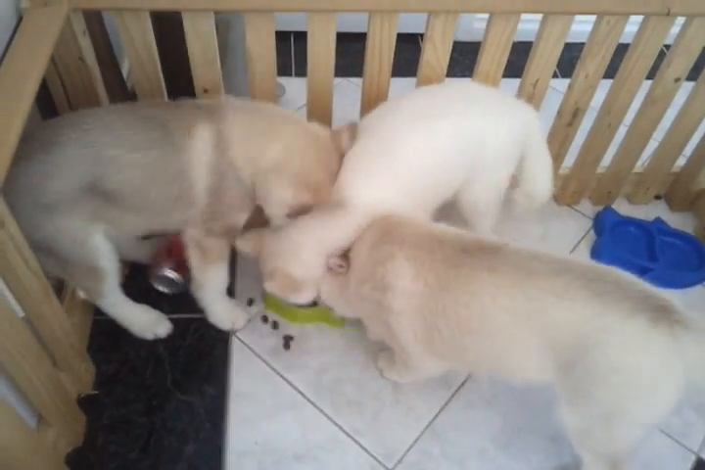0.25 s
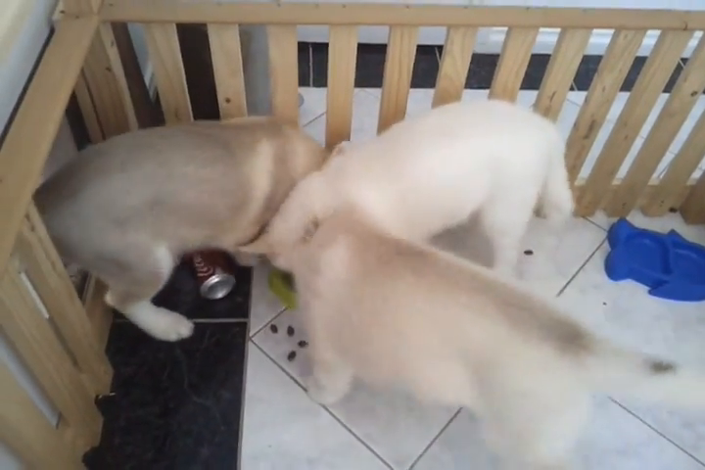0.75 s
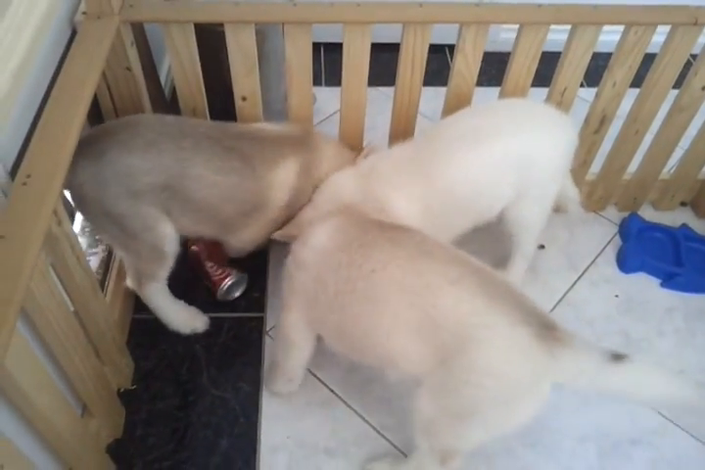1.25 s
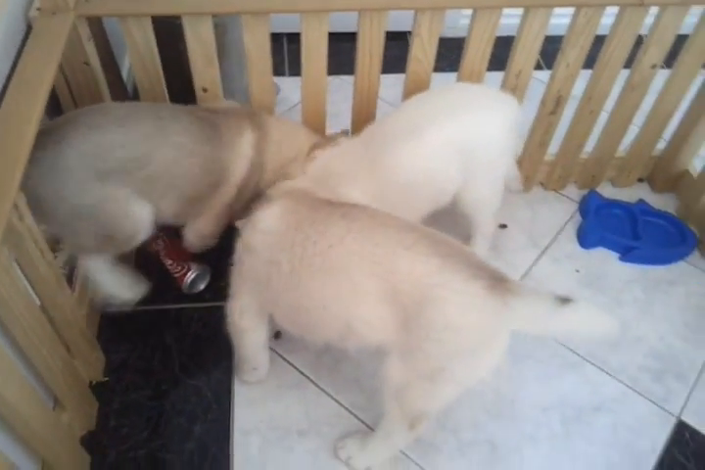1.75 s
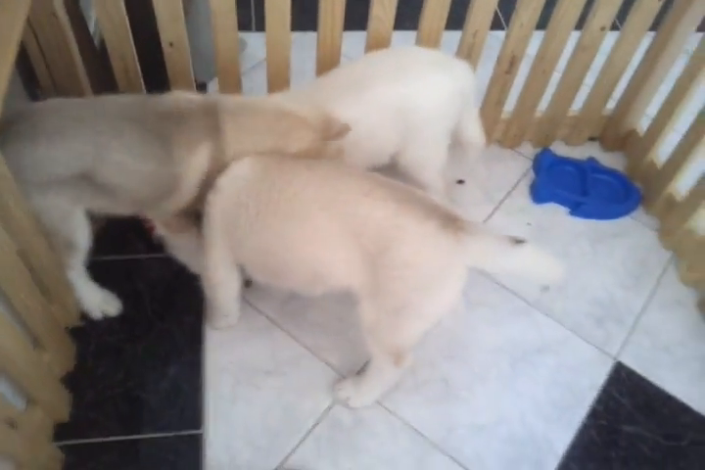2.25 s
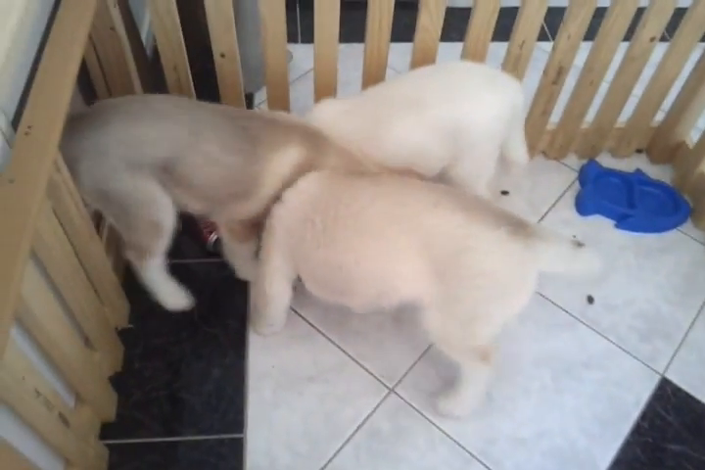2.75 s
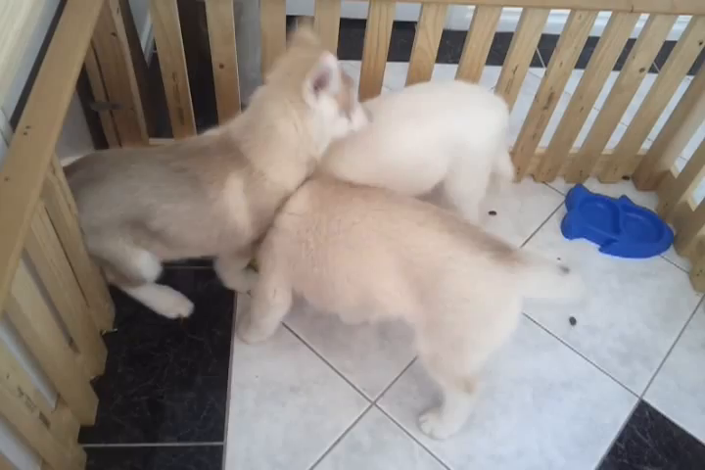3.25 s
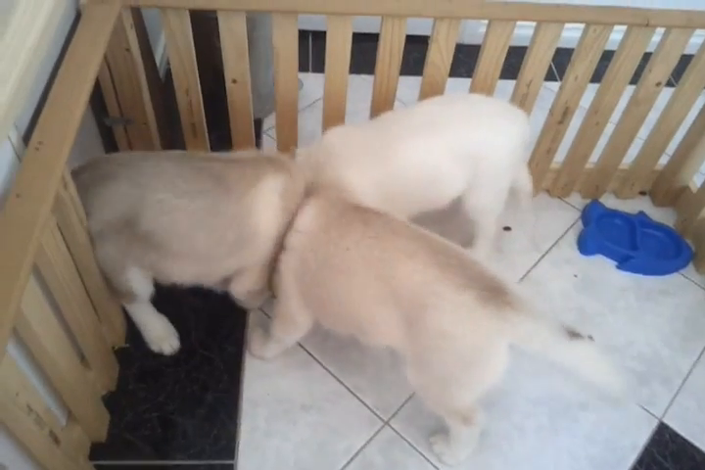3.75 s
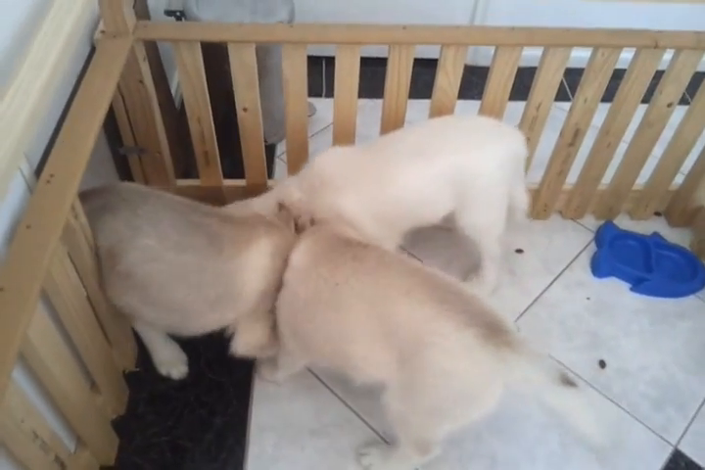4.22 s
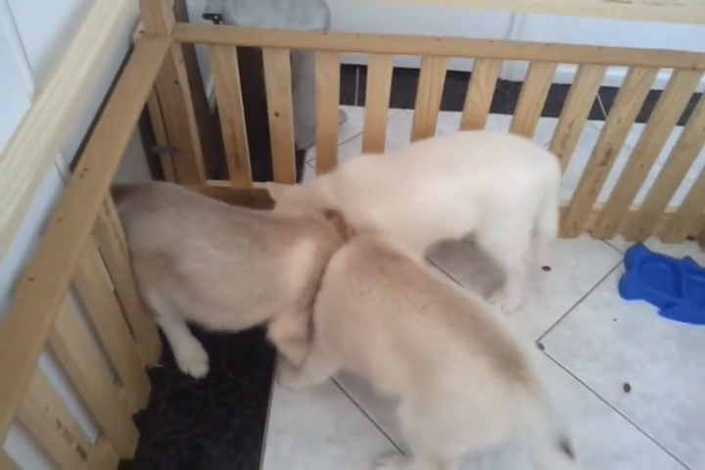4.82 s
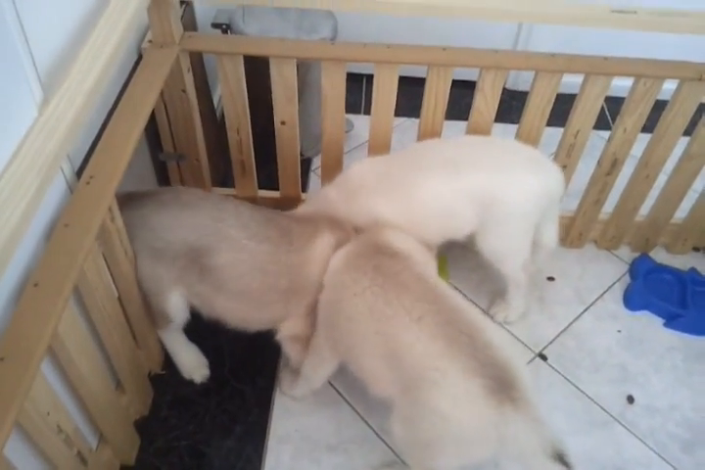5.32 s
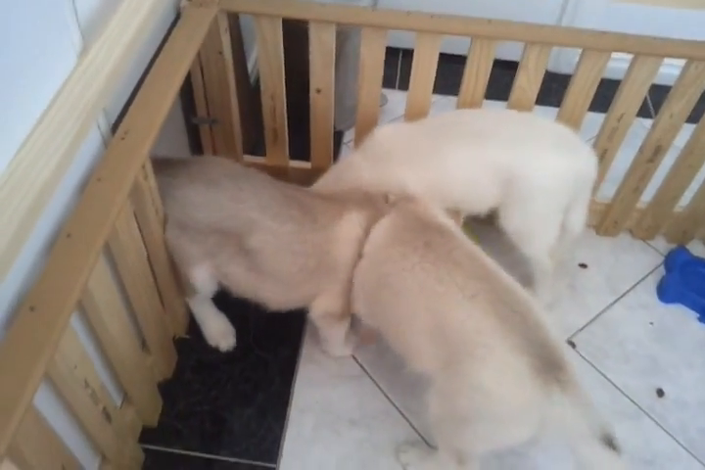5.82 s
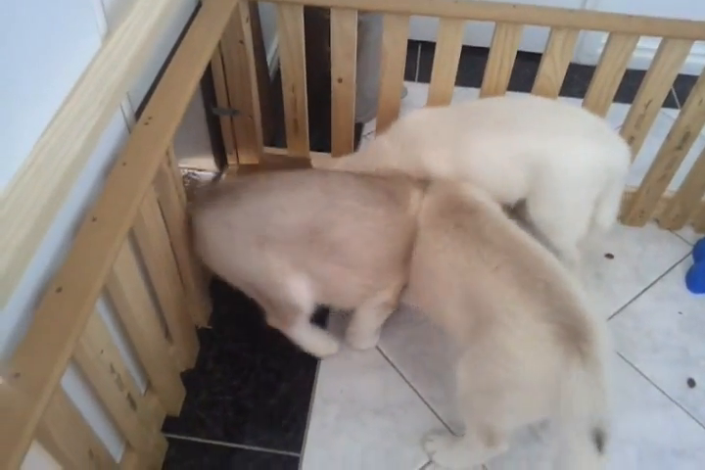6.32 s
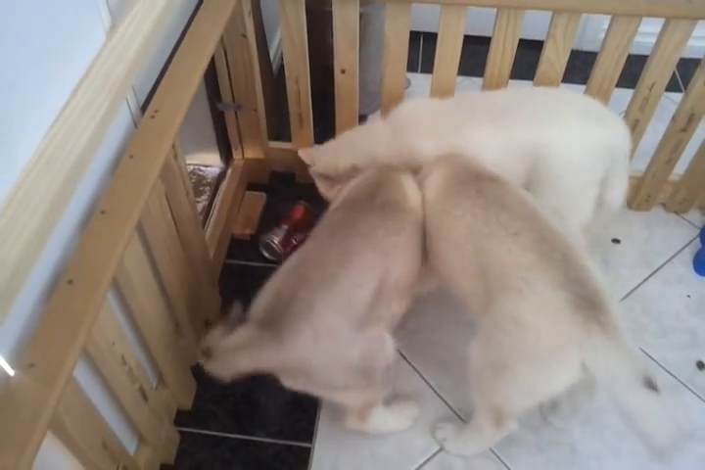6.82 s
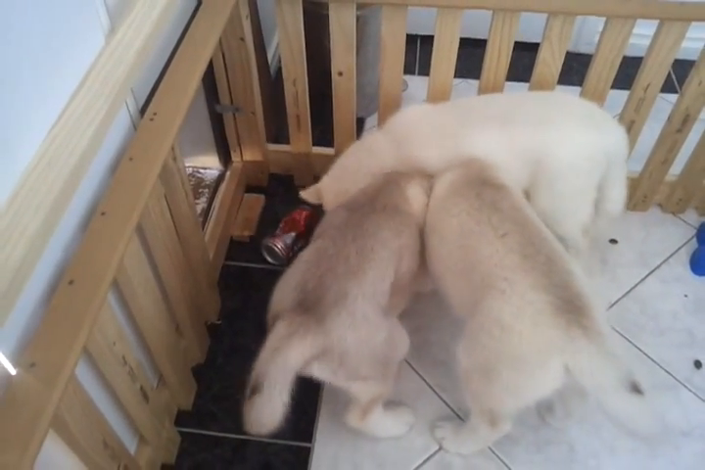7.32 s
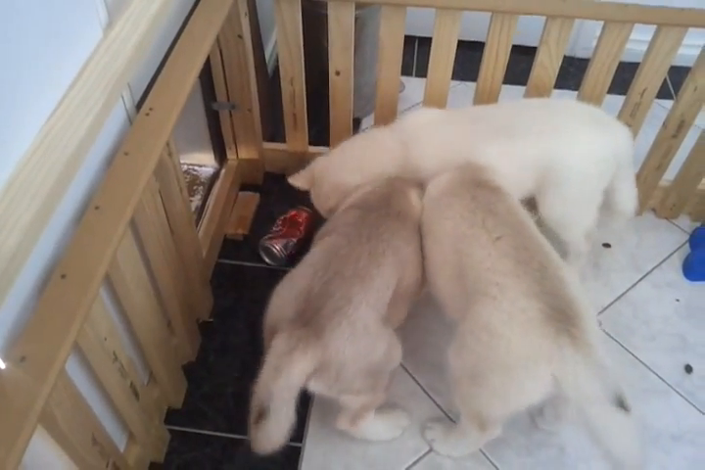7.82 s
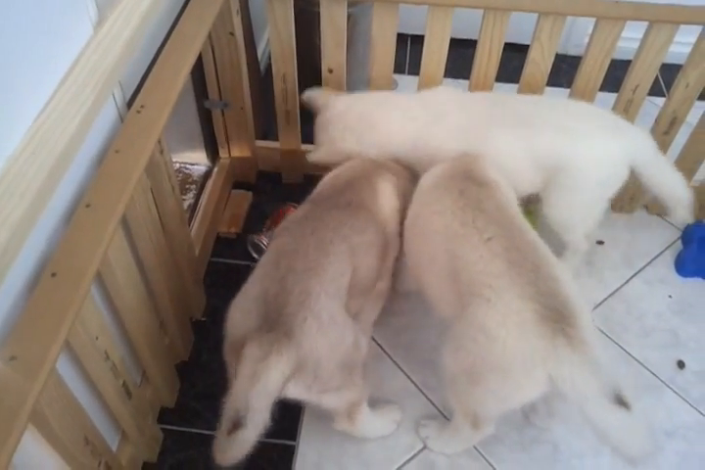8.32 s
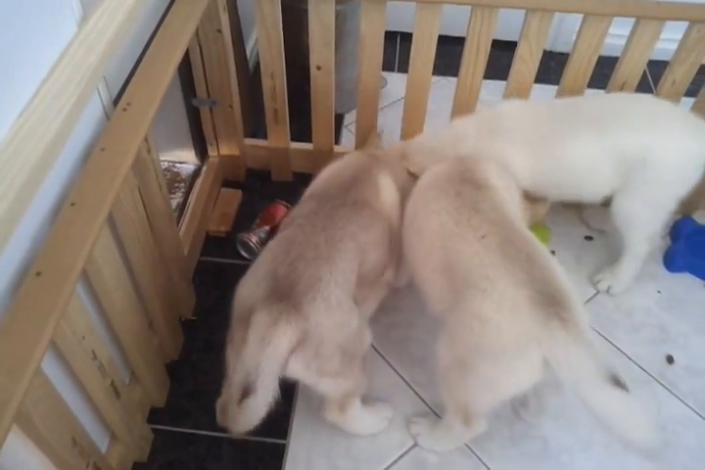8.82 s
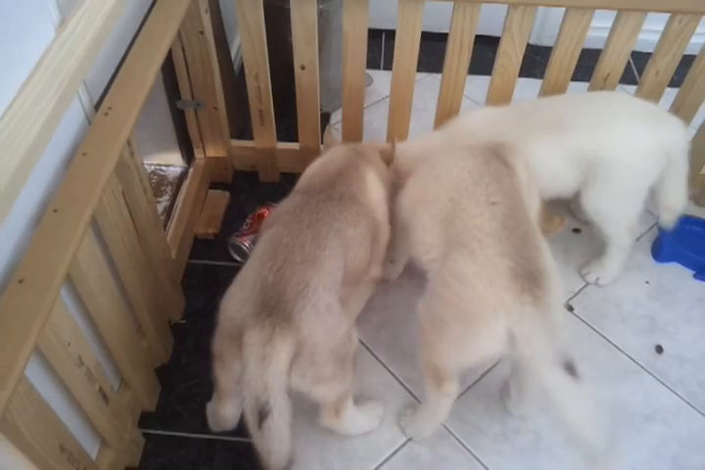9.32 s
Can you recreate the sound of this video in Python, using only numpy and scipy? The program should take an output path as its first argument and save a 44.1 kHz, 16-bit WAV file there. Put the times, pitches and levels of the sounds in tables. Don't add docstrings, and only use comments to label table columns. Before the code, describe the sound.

A plastic food bowl scrapes and bangs on a tile floor in an echoing bare room as puppies jostle, kibble ticks and a metal can clanks.

```python
import sys
import numpy as np
from scipy import signal
from scipy.fft import rfft, irfft, next_fast_len
from scipy.io import wavfile
from scipy.ndimage import uniform_filter1d, minimum_filter1d

SR = 44100
rng = np.random.default_rng(int(sys.argv[2]) if len(sys.argv) > 2 else 0)


def boost_factor(decibels):
    exponent = np.asarray(decibels, float) / 20
    return 10 ** exponent


def unload_wav(signal):
    wavfile.write(
        sys.argv[1],
        SR,
        np.round(np.clip(np.atleast_2d(signal).T, -1, 1) * 32767).astype(np.int16),
    )


N = 421596


def unit(x):
    return x / np.sqrt(np.mean(x ** 2) + 1e-20)


def peaked(x):
    return x / np.abs(x).max()


def add(out, x, s):
    part = out[round(s * SR):][:len(x)]
    part += x[:len(part)]


def along(points, hz):
    point_hz, value = np.transpose(points)
    return np.interp(np.log(hz + 1), np.log(point_hz + 1), value)


def filtered(x, response):
    size = next_fast_len(len(x) + 1024)
    return irfft(rfft(x, size) * response(np.fft.rfftfreq(size, 1 / SR)), size)[:len(x)]


def coloured(x, spectrum):
    return filtered(x, lambda hz: boost_factor(along(spectrum, hz)))


def resonant(x, modes):
    def response(hz):
        total = 0
        for k, (centre, width, db) in enumerate(modes):
            rub = 1j * hz * width
            total = total + (-1) ** k * boost_factor(db) * rub / (centre * centre - hz * hz + rub)
        return total
    return filtered(x, response)


def grains(count, rate, spread_db):
    hit, size, sign = rng.random((3, count))
    return (hit < rate / SR) * boost_factor(-spread_db * np.log(size + 0.018)) * np.sign(sign - .5)


def spray(count, rate, life, first):
    x = grains(count, rate, spread_db=3.5) * np.exp(-np.arange(count) / SR / life)
    x[0] = first
    return x


def swells(s, db, fade_s, rest_db, rise_share=0.58):
    t = np.arange(0, N, 256) / SR
    s, db, fade_s, rise_share = [np.reshape(column, (-1, 1)) for column in (s, db, fade_s, rise_share)]
    fall_db = 20 * np.where(t > s, t - s, (s - t) / rise_share) / fade_s
    power = np.sum(boost_factor(db - fall_db) ** 2, axis=0) + boost_factor(rest_db) ** 2
    return np.interp(np.arange(N) / SR, t, np.sqrt(power))


def ring(db, hz, t60, attack_s):
    t = np.arange(SR // 2) / SR
    return boost_factor(db - 60 * t / t60) * (1 - np.exp(-t / attack_s)) * np.sin(2 * np.pi * hz * t)


# frequency in Hz, level in dB.
HUSH_COLOUR = [(12, -31.5), (20, 0.5), (74, -2), (108, -6), (187, -20), (266, -1.5), (334, -22),
               (499, -5.5), (2370, -13.5), (6010, -13.5), (8120, -22), (10600, -72), (17900, -120)]


def hush():
    return boost_factor(-51) * unit(coloured(rng.standard_normal(N), HUSH_COLOUR))


# frequency in Hz, time to fall 60 dB in seconds.
ROOM_DECAY = [(100, 0.17), (500, 0.8), (1500, 0.59), (4000, 0.6), (8000, 0.23)]


def room(x):
    hz, t, z = signal.stft(rng.standard_normal(3 * SR // 4), SR, nperseg=256)
    fade = boost_factor(-60 * t / along(ROOM_DECAY, hz)[:, None])
    tail = signal.istft(z * fade, SR, nperseg=256)[1]
    age = np.arange(len(tail)) / SR
    lumps = np.repeat(rng.standard_normal(len(tail) // 64 + 1), 64)[:len(tail)]
    tail = tail * boost_factor(3.8 * np.clip(lumps, -2, 2) * np.exp(-age / .08))
    tail = tail * (1 - np.exp(-age / 0.00088))
    return signal.fftconvolve(x, boost_factor(6) * tail / np.linalg.norm(tail))


# frequency in Hz, width in Hz, level in dB.
BOWL_MODES = [(518.5, 33, -3.5), (608, 31, -0.5), (654, 124, -5.5), (746, 66, -3), (941, 185, -8),
              (1284, 256, -7.5), (1478, 142, -4), (1687, 480, -12.5), (2370, 220, -14), (2935, 644, -22.5)]
# frequency in Hz, width in Hz, level in dB.
DEEP_MODES = [(124, 28, -19), (234.6, 27, -1), (365, 53.4, 0.5), (449, 41.6, 0.5)]
# frequency in Hz, level in dB per Hz.
PELLET_COLOUR = [(1180, -43.5), (2000, -9.5), (4930, -2.5), (6540, 1), (8120, -8.5), (10600, -58),
                 (17900, -120)]
# frequency in Hz, level in dB per Hz.
THUD_COLOUR = [(30, -27), (70, 8), (130, 7), (250, 8), (400, -2), (800, -52.5)]
# full push in seconds, push in dB, pellets over push in dB, time to fade 20 dB in seconds.
DRAGS = [(.001, -9.5, -13, 0.0456), (.4, -25.5, -12.5, 0.21), (.52, -23, -12, 0.27),
         (1.171, -33.5, -6, 0.46), (1.817, -29, -5, 0.24), (2.95, -36, -8.5, 0.26), (3.6, -21.5, -10, .15),
         (4.532, -26, -10, 0.32), (5.085, -20.5, -3.5, 0.18), (5.479, -25.5, -11.5, 0.19),
         (6.465, -19.5, -14, 0.11), (6.53, -27.5, -3.5, 0.14), (6.843, -31.5, 2.5, 0.23),
         (7.155, -26.5, -13.5, 0.26)]
# full push in seconds, push in dB, pellets over push in dB, time to fade 20 dB in seconds.
SKIDS = [(.12, -35, 4, 0.7), (.331, -14.5, -12.5, 0.27), (.64, -30, -8, 0.07), (.95, -38, -5.5, .3),
         (1.435, -21, -12.5, 0.24), (1.53, -27, -17.5, 0.14), (2.3, -41.5, -8, 1), (2.573, -32, -3, 0.38),
         (3.05, -35.5, -3, .3), (3.189, -37, -9.5, 0.5), (3.735, -18, -10, .17), (3.95, -35.5, -8.5, .4),
         (4.13, -32, -6.5, .5), (4.65, -36, -2.5, 0.26), (4.88, -33.5, -10, .2), (5.179, -25, -9.5, 0.26),
         (5.96, -36.5, -10.5, 0.3), (6.06, -31.5, -9, 0.16), (6.271, -41, -10, 0.8), (6.74, -40, -11, 0.7),
         (6.9, -20, -16.5, 0.2154), (7.62, -48.5, -10, 0.6), (7.78, -48.5, -1, 0),
         (8.089, -44.5, -10.5, 0.26), (9.02, -44.5, -9, 0.6), (8.915, -19, -13.5, 0.0945),
         (8.8, -30, -7.5, 0.22), (9.2, -45, -8.5, .2), (9.555, -33, -11, .15)]
# full push in seconds, push in dB, pellets over push in dB, time to fade 20 dB in seconds.
JOLTS = [(.256, -22, -4.5, 0.31), (.796, -28.5, -11, .5), (2.135, -29.5, -10, 0.28), (2.853, -38, 8, 0.24),
         (3.432, -30, -8.5, 0.64), (4.46, -42.5, -2, 0.23), (5.003, -29, -4, 0.5), (5.891, -32, -6, .3),
         (6.425, -28, -17, 0.22), (7.487, -37.5, -1, 0.1), (9.31, -30.5, -9, 0.2)]
# time in seconds, level in dB.
SHUFFLES = [(.001, -42), (.331, -34), (.643, -43), (1.15, -48), (1.435, -31.5), (1.817, -38), (2.125, -45),
            (2.573, -49.5), (2.913, -46.5), (3.351, -45.5), (3.662, -48.5), (4.05, -45.5), (4.306, -47),
            (4.532, -41.5), (5.179, -51), (5.4, -54), (6.095, -46.5), (6.42, -47), (6.843, -41),
            (7.155, -40), (7.45, -50), (8.05, -51), (8.89, -41.5), (9.37, -44.5)]


def slide():
    s, push_db, pellet_db, fade_s = np.transpose(DRAGS + SKIDS + JOLTS)
    rows = [len(DRAGS), len(SKIDS), len(JOLTS)]
    deep_db = np.repeat([-1.5, -12.5, -7.5], rows)
    rise = np.repeat([0.58, 0.58, 0.028], rows)
    slips = grains(N, rate=600, spread_db=4.2)
    ticking = grains(N, rate=1500, spread_db=6.0)
    steps = grains(N, rate=87, spread_db=2)
    rest_db = -56
    shell = swells(s, push_db, fade_s, rest_db, rise) * unit(resonant(slips, BOWL_MODES))
    deep_gain = swells(s, push_db + deep_db, fade_s, rest_db - 6.5, rise)
    deep = deep_gain * unit(resonant(slips, DEEP_MODES[2:]))
    rattle_gain = swells(s, push_db + pellet_db, fade_s, -63, rise)
    rattle = rattle_gain * unit(coloured(ticking, PELLET_COLOUR))
    shuffle_s, shuffle_db = np.transpose(SHUFFLES)
    rumble_gain = swells(shuffle_s, shuffle_db, fade_s=.2, rest_db=-60)
    rumble = rumble_gain * unit(coloured(steps, THUD_COLOUR))
    return boost_factor(-11.5) * (shell + deep) + boost_factor(-10) * rattle + boost_factor(-4.5) * rumble


def knock(db, hz, upper_db, crack_db, deep_db):
    blows = spray(SR // 8, rate=1400, life=0.01, first=9.4)
    modes = []
    for centre, width, level in BOWL_MODES:
        modes.append((centre * np.exp(rng.normal(0, .01)), width, level + rng.normal(0, 1.5)))
    shell = peaked(resonant(blows, modes[:5] + [(hz, hz / 12, 3)]))
    upper = peaked(resonant(blows, modes[5:]))
    crack = peaked(resonant(blows, [(3300, 2400, 0.005), (6000, 6000, 0.01)]))
    deep = peaked(resonant(blows, DEEP_MODES))
    bright = boost_factor(upper_db + 9.5) * upper + boost_factor(crack_db + 9.5) * crack
    return boost_factor(db - 9) * (shell + bright + boost_factor(deep_db) * deep)


# start in seconds, peak in dB, loudest mode in Hz, upper modes in dB.
ROCKS = [(.004, -11, 528, -14.5), (.03, -7, 673, -6.5), (1.065, -14, 930, -3), (1.274, -11, 1194, -4),
         (1.722, -17, 489, -12), (1.799, -16, 498, -8), (1.849, -17, 680, -13), (2.158, -17.5, 520, -6),
         (2.707, -23, 790, -14), (4.089, -17, 676, -11), (5.004, -16, 504, -17), (5.229, -12.5, 664, -14.5),
         (5.401, -10, 678, -14.5), (5.679, -32.5, 635, -2), (5.887, -21.5, 550, -18),
         (6.035, -20, 1085, -4.5), (6.186, -22, 633, -5.5), (7.485, -12.5, 680, -3.5),
         (7.906, -27, 503, -16), (8.031, -24.5, 931, -4.5), (8.178, -35, 667, -8.5), (8.895, -22, 712, -14),
         (9.184, -28, 550, -5.5), (9.317, -13, 675, -10)]
# start in seconds, peak in dB, loudest mode in Hz, upper modes in dB.
BUMPS = [(.277, -1, 607, -6), (1.656, -16.5, 970, -3.5), (2.501, -13, 646, -.5), (2.965, -11.5, 531, -3),
         (3.511, -0.5, 770, -10.5), (3.562, -8.5, 746, -3.5), (3.67, -8, 1033, -4),
         (3.837, -17.5, 1000, -9.5), (4.13, -15.5, 721, -19.5), (4.27, -24, 577, -7),
         (4.533, -8.5, 681, -9), (5.27, -19, 620, -6), (5.43, -14.5, 685, -7), (6.829, -7, 650, -2),
         (7.05, -7.5, 663, -7), (7.075, -8, 715, -12.5), (7.162, -12.5, 678, -5.5), (7.242, -24, 726, -19),
         (8.7, -5, 1300, -7)]
# start in seconds, peak in dB, loudest mode in Hz, upper modes in dB.
RAPS = [(.793, -12, 598, -18.5), (1.054, -15, 900, -19), (1.346, -8, 987, -2.5), (2.179, -26.5, 497, -10),
        (2.852, -18, 860, -9.5), (3.37, -21, 512, -17), (3.431, -18, 1076, -14), (3.483, -17.5, 760, -8.5),
        (3.985, -18, 884, -5.5), (4.459, -20, 643, -7.5), (6.578, -15.5, 662, -16.5),
        (6.782, -2, 608, -9.5), (7.361, -23, 590, -1.5), (8.719, -9, 686, -1)]


def bowl_knocks(out):
    for blows, crack_db, deep_db in [(ROCKS, -13, -10), (BUMPS, -28.5, -23.5), (RAPS, -13, -25.5)]:
        for s, db, hz, upper_db in blows:
            add(out, knock(db, hz, upper_db, crack_db, deep_db), s)


def click(db, hz):
    snap = spray(SR // 20, rate=1500, life=.006, first=4)
    modes = [(hz * 0.72, hz / 5, -4), (hz, hz / 4, 0), (hz * 1.6, hz / 1.7, -6.5)]
    return boost_factor(db - 2.0) * peaked(resonant(snap, modes))


# start in seconds, peak in dB, centre in Hz.
CLAWS = [(.0162, -24, 1840), (.5945, -13.5, 2320), (.7908, -21.5, 2460), (1.27, -19.5, 2370),
         (1.3447, -3, 2370), (1.347, -9.5, 3550), (2.8335, -29, 2700), (2.8524, -14.5, 2200),
         (3.4605, -23.5, 1870), (3.5125, -6.5, 2830), (4.5322, -27.5, 2000), (5.2315, -23.5, 2420),
         (5.4, -19.5, 2360), (6.779, -22.5, 1810), (7.4889, -16.5, 2550), (8.035, -22.5, 2500),
         (8.7012, -16, 2230)]
# start in seconds, peak in dB, centre in Hz.
TICKS = [(.04, -20.5, 5000), (.115, -24, 4500), (.5146, -20, 3500), (.85, -27, 4500), (1.065, -11, 3970),
         (1.38, -16, 6500), (2.1796, -19.5, 5520), (2.3456, -11.5, 2540), (2.3863, -17.5, 2450),
         (2.7774, -19.5, 3340), (3.0718, -20, 6000)]
# start in seconds, peak in dB, centre in Hz.
CRACKS = [(.2749, -0.5, 3880), (1.4135, -13.5, 3300), (1.6545, -15.5, 3400), (2.045, -25.5, 3420),
          (2.4832, -15, 5000), (2.5027, -2.5, 6000), (2.852, -12, 4470),(2.9658, -13.5, 3300),
          (3.2745, -21, 3940), (3.406, -27.5, 5160), (3.4256, -20.5, 3400), (3.562, -9, 6000),
          (3.6721, -9, 3420), (4.3351, -22.5, 3150), (4.4597, -11, 3200), (5.0054, -13.5, 6400),
          (5.5948, -22, 3620), (5.908, -23, 6370), (6.2887, -25.5, 4400), (7.0464, -22, 3930),
          (7.3736, -18.5, 4500), (7.9409, -32.5, 4090), (9.3108, -24, 4060)]


def claws_and_pellets(near, far):
    for clicks, room_db in [(CLAWS, -5), (TICKS, -12), (CRACKS, -2)]:
        for s, db, hz in clicks:
            sound = click(db, hz)
            add(near, boost_factor(-2.5) * sound, s)
            add(far, boost_factor(room_db) * sound, s)


# start in seconds, peak in dB, frequency in Hz.
CHIPS = [(.1131, -21, 5500), (.2563, -17, 4000), (.5127, -20, 4500), (.604, -22, 5000), (1.066, -19, 5200),
         (2.137, -30, 2380), (2.3436, -19, 2440), (2.4838, -12, 5720), (3.265, -30, 3630),
         (3.9853, -28, 4000), (5.065, -27, 6400), (5.23, -26, 4200), (5.401, -27, 5500), (5.595, -30, 6200),
         (5.91, -28, 4500), (6.108, -31, 3300), (6.288, -29, 6800), (6.553, -24, 5000), (6.1873, -36, 2260),
         (6.4223, -30, 2490), (6.832, -14, 3500), (7.035, -30, 6000), (7.2928, -32, 3320), (7.3, -32, 5000),
         (8.6647, -40, 4910), (9.3197, -28, 4010)]


def kibble_chips(near, far):
    for s, db, hz in CHIPS:
        chip = ring(db, hz, t60=.005, attack_s=1 / hz)
        add(near, chip, s)
        add(far, boost_factor(-10) * chip, s)


# start in seconds, peak in dB, frequency in Hz, 60 dB fall in seconds.
RINGS = [(.276, -20, 4010, .06), (.278, -15, 608, .15), (.42, -18, 1150, .15), (.51, -19, 1050, .15),
         (.812, -30, 2370, .05), (1.273, -31, 2370, .08), (1.346, -15, 2370, .07), (1.346, -17, 3550, .05),
         (1.35, -19, 1640, .15), (1.416, -24, 3300, .1), (1.42, -16, 1020, .1), (1.445, -18, 1110, .06),
         (1.49, -19, 530, .25), (1.53, -22, 500, .2), (3.475, -26, 775, .2), (3.512, -15, 775, .25),
         (3.512, -18, 2830, .1), (3.513, -22, 3250, .06), (3.514, -14, 1110, .2), (3.563, -21, 4200, .06),
         (3.57, -19, 1480, .12), (3.67, -16, 1567, .13), (3.67, -15, 931, .4), (3.715, -16, 931, .3),
         (3.722, -23, 1850, .15), (3.73, -21, 1007, .2), (3.84, -21, 1000, .05), (4.4585, -25, 3300, .04),
         (4.5, -25, 620, .1), (4.533, -14, 700, .05), (5.06, -24, 480, .15), (5.09, -22, 540, .12),
         (5.27, -22, 600, .08), (6.808, -11, 1150, .08), (6.815, -14, 1500, .05), (6.856, -12, 1150, .05),
         (6.884, -19, 620, .08), (7.05, -15, 1450, .04), (7.163, -13, 680, .05), (8.702, -19, 690, .18),
         (8.703, -25, 2230, .06), (8.712, -17, 1470, .1), (8.865, -23, 690, .12), (8.91, -19, 690, .15),
         (8.94, -22, 770, .15), (9.312, -22, 1270, .1), (9.312, -21, 600, .08), (9.325, -20, 930, .05),
         (7.077, -14, 760, .04), (7.906, -31, 520, .06)]


def lone_rings(near, far):
    for s, db, hz, t60 in RINGS:
        tone = ring(db, hz, t60, attack_s=.0015)
        add(near, tone, s)
        add(far, boost_factor(-12) * tone, s)


# frequency in Hz, level in dB, time to fall 60 dB in seconds.
CAN_MODES = [(834, -24, 0.13), (931, -4.5, 0.24), (1121, 3.5, 0.4), (1530, 6, 0.11), (1470, -19, .12),
             (1890, -13.5, 0.3), (2370, -15.5, 0.15), (2830, -33, 0.11), (3316, -3, 0.029),
             (3570, -29, .07), (4400, -21, 0.055)]
# start in seconds, peak in dB, ring length factor, main mode in dB, high modes in dB.
KICKS = [
    (1.277, -20, 1.1, 1.5, -3),
    (1.346, -8, 1.3, 6.5, 10.5),
    (1.657, -26.5, 1.2, 4, 10),
    (3.511, -12, 2.7, 4.5, 2),
    (3.67, -10, 1.4, 12, -3),
    (6.781, 1, 0.62, 8, -10),
    (8.029, -35, 0.4, -1, 3),
]


def can_kicks(out):
    t = np.arange(SR // 2) / SR
    for s, db, length, main_db, high_db in KICKS:
        tones = []
        for hz, level, t60 in CAN_MODES:
            decay = boost_factor(level + rng.normal(0, 1) - 60 * t / (t60 * length))
            tones.append(decay * np.sin(2 * np.pi * hz * t))
        wall = tones[0] + boost_factor(main_db) * tones[1] + sum(tones[2:6]) + boost_factor(high_db) * sum(tones[6:])
        add(out, boost_factor(db - 7) * peaked(wall), s)


# frequency in Hz, width in Hz, level in dB.
TILE_MODES = [(1580, 250, 2), (2450, 380, 0), (3330, 460, -4), (4170, 600, -9)]
# start in seconds, peak in dB.
BOUNCES = [
    (1.346, -5.5),
    (2.7777, -20),
    (3.5115, -10),
    (3.67, -15.5),
    (4.4597, -15),
]


def pellet_bounces(out):
    blow = np.zeros(SR // 20)
    blow[0] = 1
    for s, db in BOUNCES:
        add(out, boost_factor(db - 3.5) * peaked(resonant(blow, TILE_MODES)), s)


# start in seconds, peak in dB, frequency in Hz.
PAWS = [
    (1.419, -36.5, 97),
    (3.509, -49, 176),
    (4.519, -43.5, 194),
    (6.68, -37, 132),
    (7.045, -34, 87),
    (8.032, -36, 166),
    (8.698, -28.5, 99),
]


def paw_falls(out):
    t = np.arange(SR // 5) / SR
    for s, db, hz in PAWS:
        push = np.sin(2 * np.pi * hz * t) * np.exp(-t / 0.0058) * (1 - np.exp(-t / 0.0037))
        add(out, boost_factor(db - 1.0) * peaked(push), s)


def squeak():
    length_s, start_hz, sag = .19, 3400, .08
    u = np.linspace(0, 1, int(length_s * SR))
    wobble = 1 + .15 * uniform_filter1d(rng.standard_normal(len(u)), size=100)
    hz = start_hz * (1 - sag * (1 - np.exp(-4 * u))) * wobble
    return boost_factor(-59) * np.abs(np.sin(np.pi * u)) ** .5 * np.sin(2 * np.pi * np.cumsum(hz) / SR)


def scene():
    scrape, struck = slide(), np.zeros(N)
    bowl_knocks(struck)
    can_kicks(struck)
    pellet_bounces(struck)
    paw_falls(struck)
    near = struck + boost_factor(3) * scrape
    far = struck + boost_factor(-.6) * scrape
    claws_and_pellets(near, far)
    kibble_chips(near, far)
    lone_rings(near, far)
    add(near, squeak(), 8.42)
    out = near + hush()
    step = SR // 3
    for start in range(0, N, step):
        add(out, room(far[start:start + step]), start / SR)
    return out[None]


def roll_off(x):
    return signal.sosfilt(signal.butter(12, 8270, fs=SR, output="sos"), x)


def record(dry):
    need = np.minimum(1, .93 / (np.abs(dry[0]) + 1e-9))
    gain = uniform_filter1d(minimum_filter1d(need, size=441), size=221)
    x = filtered(gain * dry[0], lambda hz: 1 / (1 + (hz / 7700) ** 24) * (hz < 8170))
    x = x - 0.28 * filtered(x, lambda hz: 1 / (1 + 1j * hz / 110))
    mix = x[None]
    return roll_off(mix)


dry = scene()
out = record(dry)
unload_wav(out)
```